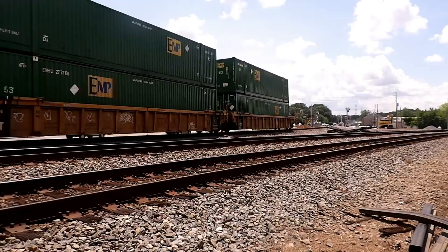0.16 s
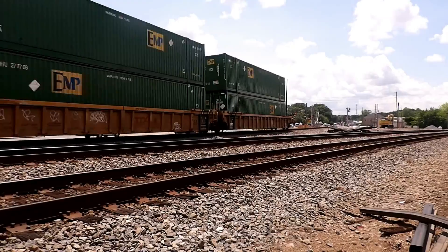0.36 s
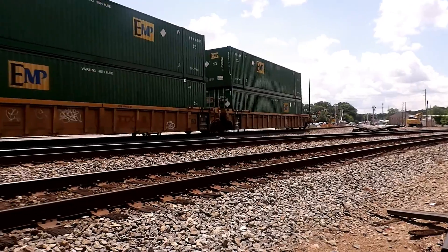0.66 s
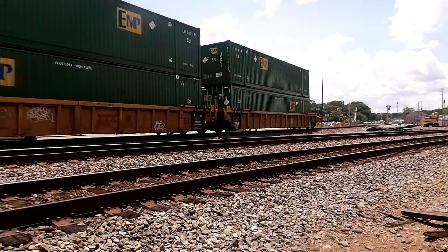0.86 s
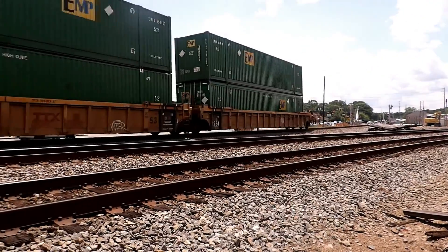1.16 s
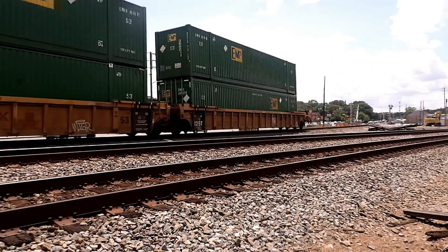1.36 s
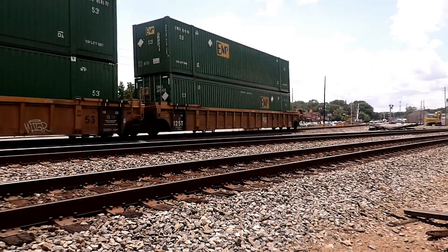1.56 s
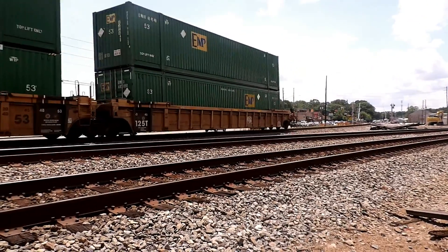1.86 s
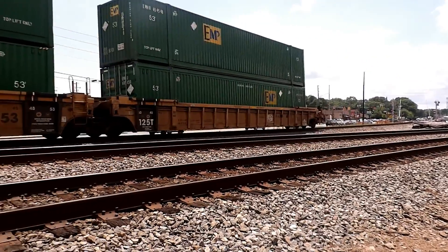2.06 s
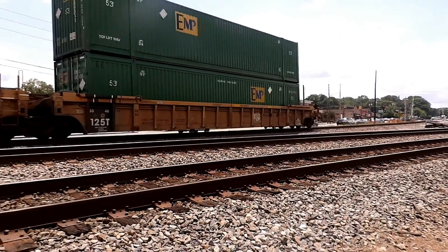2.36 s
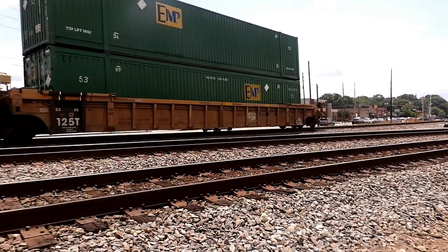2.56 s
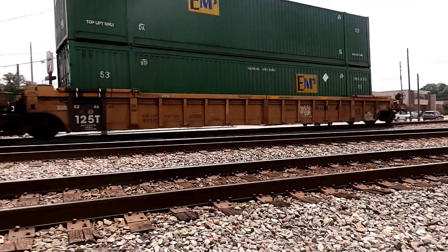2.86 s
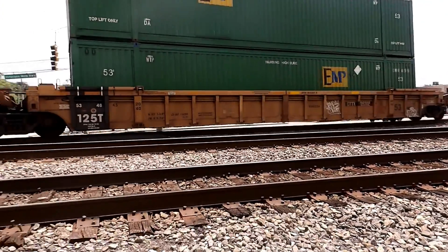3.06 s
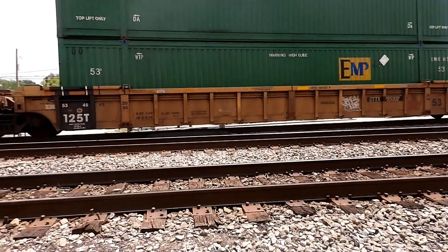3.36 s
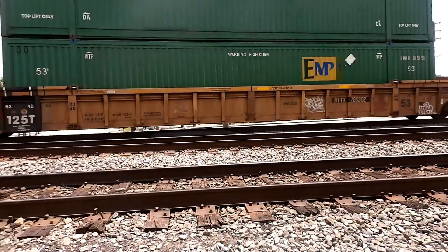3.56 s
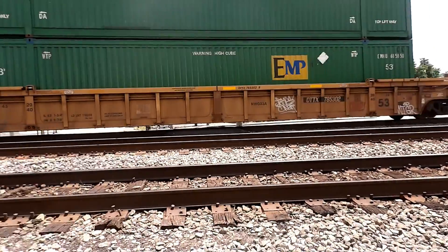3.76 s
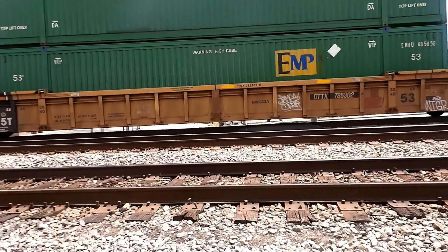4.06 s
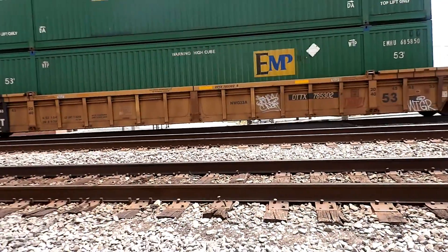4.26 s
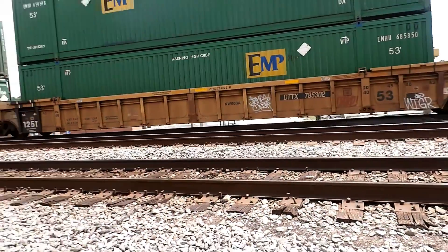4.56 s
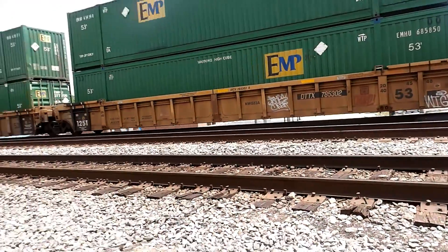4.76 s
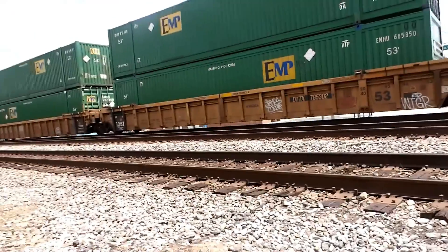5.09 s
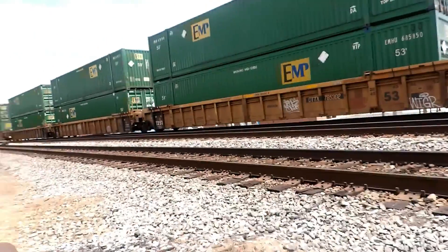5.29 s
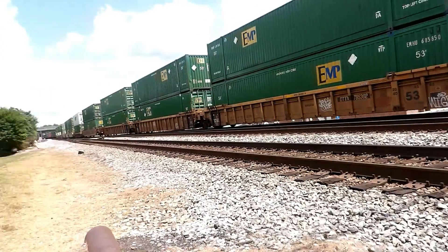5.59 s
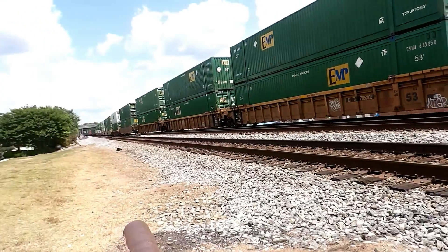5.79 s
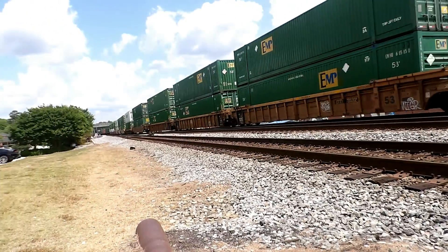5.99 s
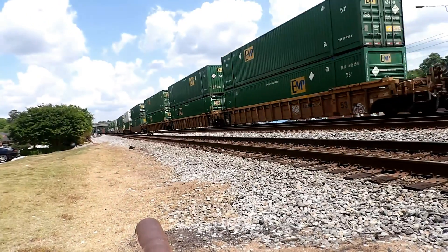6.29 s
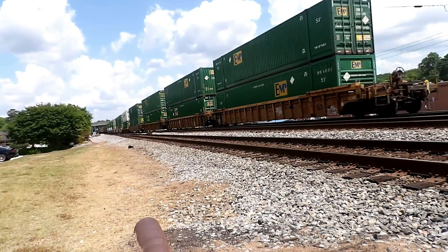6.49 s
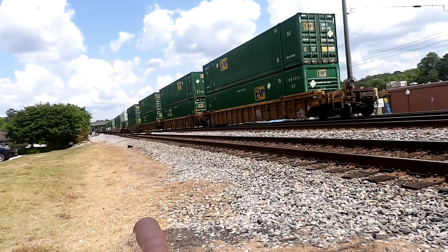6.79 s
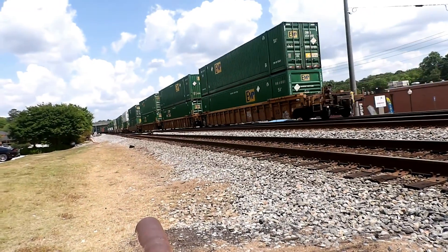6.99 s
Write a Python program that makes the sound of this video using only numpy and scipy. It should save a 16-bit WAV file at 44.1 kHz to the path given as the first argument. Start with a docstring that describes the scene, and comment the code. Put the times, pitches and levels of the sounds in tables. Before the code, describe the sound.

A freight train rolls past close by outdoors. Its steel wheels grind on the rails with a bright hiss and many overlapping high squeals, over the low rumble of the cars. After about two seconds, wind starts to flutter and pop on the handheld microphone. The ringing peaks as the wheels pass, dropping slightly in pitch. Then the squeals stop and the hiss fades, leaving short scrapes, rumble and gusts.

```python
"""A double-stack freight train rolls past at about 8 m/s. From the start, flanges grind on the rail: the
steel wheels hiss through their modes and lock into high squeals over the rumble of the cars. From 2 s,
wind flutters and pops on the single microphone of a hand-held camera. Near 3 s the wheels are abreast:
they ring most and their Doppler fall is steepest. After 5 s the squeals end and the hiss fades and
dulls; short scrapes, rumble and gusts remain."""
import sys
import numpy as np
from scipy import signal
from scipy.fft import rfft, irfft, next_fast_len
from scipy.io import wavfile
from scipy.ndimage import uniform_filter1d, map_coordinates

SR = 44100
rng = np.random.default_rng(int(sys.argv[2]) if len(sys.argv) > 2 else 0)


def generate_wav(signal):
    """Clip the signal to [-1, 1] and save it as 16-bit WAV at the path in sys.argv[1]."""
    frames = np.transpose(np.atleast_2d(signal))
    scaled = np.clip(frames, -1, 1) * 32767
    pcm = np.round(scaled).astype(np.int16)
    wavfile.write(sys.argv[1], SR, pcm)


N = 314860
TIME_S = np.arange(N) / SR

# flange grinding: time_s, level_db
GRIND_LEVEL = [(0, -18.5), (.46, -17), (.66, -20), (.95, -19.5), (1.23, -16), (1.9, -19.5), (2.27, -21.5),
               (2.65, -20.5), (3.1, -24), (3.42, -20.5), (3.55, -26.5), (4.12, -27.5), (4.3, -23),
               (4.78, -20.5), (5.25, -27.5), (5.95, -34), (7.14, -38)]
# friction brightness, dull once the wheels have passed: time_s, tilt_db_per_octave
GRIND_TILT = [(0, -1), (.48, 1), (.7, 0.1), (2, -0.23), (3, 1.3), (4.1, 0.2), (4.55, -1.1), (5.1, 1.3),
              (6.2, -4.5), (7.14, -5.5)]
# friction spectrum, shapes each band: freq_hz, density_db
FRICTION_SPECTRUM = [(250, -8), (500, -13.5), (900, -6), (1400, 0), (2000, 3.5), (4200, 1), (4900, -1.5),
                     (6300, -4.5), (8000, -6.5), (10500, -12), (12500, -12.5), (14000, -17), (15700, -21.5)]
# friction bands, low scrape to sizzle: offset_db, tilt_lever_octaves
FRICTION_BANDS = [(-16.5, -2.5), (-7, -1.54), (-1.5, -0.5), (-2.5, 0.97), (-9.5, 1.66), (-14.5, 1.5)]
# wheel resonances, silent at or below 0 dB: rest_hz, width_hz, prominence_db
WHEEL_MODES = [(1504, 58, 3.5), (2042, 263, 4.5), (2633, 123, 3.5), (3180, 106, 5.5), (3740, 49, 5.5),
               (4050, 270, 7), (4373, 81, 9), (4810, 140, 6), (5690, 62, 4.5), (5890, 160, 7.5),
               (6700, 74, 15), (6940, 81, 6), (7130, 130, 3.5), (7600, 145, 8), (8485, 156, 8),
               (9370, 130, 2), (10300, 92, 5.5), (11130, 84, -4), (12270, 80, -3), (12620, 200, -10.5),
               (13110, 150, 7), (13500, 150, 4), (14440, 150, 2)]
# brief dips in the hiss: centre_s, length_s, depth_db
HISS_DIPS = [(0.526, 0.016, -13), (0.595, 0.0084, -18.5), (0.839, 0.032, -34), (1.061, .012, -6),
             (1.268, 0.024, -5.5), (1.316, 0.031, -10), (1.467, 0.0087, -11), (1.576, .008, -7),
             (2.563, 0.031, -8), (2.718, 0.033, -45), (2.813, 0.026, -8), (3.11, .016, -47),
             (3.753, 0.011, -26), (3.923, .015, -37), (4.024, .012, -26), (4.973, .015, -11),
             (5.123, .015, -7), (5.249, .01, -13)]
# a wheel locks into one mode: start_s, length_s, rest_hz, relative_db
WHEEL_SQUEALS = [(0, .85, 4102, -26), (.27, .24, 7214, -29), (.41, .18, 6449, -28), (.44, .19, 5599, -22),
                 (.62, .24, 5605, -28), (.66, .28, 3079, -29), (.76, .15, 1529, -29), (1, .6, 3195, -27),
                 (1.13, .19, 5556, -27), (1.14, .36, 1518, -24), (1.37, .24, 7612, -26),
                 (1.37, .28, 2616, -27), (1.38, .55, 9372, -30), (1.4, 1.5, 10275, -35),
                 (2.03, .85, 4086, -22), (2.25, .55, 3187, -29), (2.3, .85, 13096, -30),
                 (2.37, .4, 8463, -28), (2.39, .18, 5825, -23), (2.43, .8, 5918, -29),
                 (2.5, .24, 4350, -19.5), (2.55, .56, 9372, -27), (2.66, .16, 3833, -24),
                 (2.68, .74, 4393, -26), (2.76, .26, 2120, -28), (2.84, .17, 7655, -22),
                 (2.98, .52, 10245, -25), (3.03, .15, 6923, -25), (3.25, .2, 4340, -25),
                 (3.32, .32, 7558, -28), (3.36, .2, 6675, -19.5), (3.48, .3, 3725, -31),
                 (3.5, .22, 5825, -28), (3.5, .24, 4360, -30), (3.5, 1.05, 10245, -33),
                 (3.53, .17, 8463, -27), (3.55, .17, 2616, -32), (3.7, .25, 4070, -21),
                 (3.84, .32, 10237, -25.5), (3.98, .9, 4081, -27), (4.24, .2, 5889, -28),
                 (4.34, .21, 6686, -25.5), (4.4, .5, 2067, -28), (4.48, .17, 4759, -30),
                 (4.73, .18, 8764, -28), (4.78, .28, 3187, -28), (4.9, .36, 4081, -24),
                 (4.95, .28, 10261, -28), (5.15, .2, 4716, -31)]
# a flange bites the rail: start_s, length_s, attack_s, rise_db, ring_db, tilt_db_per_octave
FLANGE_BITES = [(.73, 0.098, 0.018, 2, -9.5, -1), (5.344, 0.0929, 0.021, 3, 2, 0.3),
                (5.618, 0.13, 0.021, 7, -1.5, -0.2), (5.836, 0.038, 0.013, 6.5, 4.5, -0.5),
                (6.148, 0.2, 0.057, 8.5, 3.5, 2.5), (6.353, 0.12, 0.022, 9.5, 3.5, -0.5),
                (6.633, 0.11, 0.028, 6.5, -9, 0.1), (6.856, 0.19, 0.035, 4.5, -6, -.5)]
# wheel modes rung by the bites: rest_hz, relative_db
BITE_MODES = [(1023, -18.5), (1770, -20), (2010, -9), (2470, -12), (2898, -14), (3290, -12), (3998, -20),
              (4610, -11.5), (6698, -18), (8290, -19)]
# weight of the passing cars: time_s, level_db
RUMBLE_LEVEL = [(0, -31), (1.1, -30), (2.9, -32.5), (3.6, -30), (4.05, -29), (4.4, -32.5), (5.2, -26.5),
                (6.05, -31), (6.42, -22), (6.66, -36), (7.04, -21), (7.14, -33)]
# rolling cars: freq_hz, density_db
RUMBLE_SPECTRUM = [(20, -30), (40, -28), (65, -11), (100, -4), (140, -1), (200, -5.5), (300, -13),
                   (500, -17.5), (900, -24), (2000, -63), (8000, -90)]
# gusts on the microphone: start_s, length_s, relative_db
WIND_GUSTS = [(2.147, 0.1, -27), (2.373, 0.17, -30), (2.902, 0.033, -22.5), (2.991, 0.062, -30.5),
              (3.311, 0.27, -31), (3.669, 0.051, -31), (3.843, 0.091, -27), (4.015, 0.17, -27.5),
              (4.217, 0.21, -32), (4.836, 0.23, -26), (5.068, 0.14, -27.5), (5.204, 0.1, -21),
              (5.404, 0.14, -23), (5.596, .17, -23.5), (5.89, 0.045, -27.5), (6.414, .05, -22),
              (6.517, 0.082, -29), (6.636, .17, -33.5), (7, 0.079, -27)]
# eddies at the microphone port, air speed 1: freq_hz, density_db
EDDY_SPECTRUM = [(40, -32), (130, -10), (220, 0.5), (350, -1.5), (500, -11), (700, -20.5), (1000, -28),
                 (1800, -30), (6000, -100)]
# air across the port as the camera turns: time_s, speed_ratio
AIR_SPEED = [(2.2, 1.01), (3.3, 1.214), (4.2, 1.207), (5.25, .8), (5.9, .88), (7.1, 0.78)]
# strongest eddies: centre_s, relative_db, width_cycles
EDDY_POPS = [(2.188, -6.5, 0.27), (2.206, -6, 0.25), (2.928, -4, 0.91), (3.324, -7, .6),
             (3.359, -4.5, 0.18), (3.453, -6.5, 0.39), (3.482, -5, .22), (3.535, -10, .34),
             (3.593, -5.5, 0.37), (3.965, -1.5, 0.39), (4.012, -10.5, .9), (4.057, -10, 0.51),
             (4.152, -11, 0.37), (4.693, -8.5, 0.48), (4.971, -6, 1), (5.106, -6.5, 0.19), (5.22, -8, .64),
             (5.284, -9.5, .57), (5.426, -3, .96), (5.515, -6.5, 0.8), (5.71, -4.5, 1), (5.768, -3.5, 0.97),
             (5.814, -5.5, .4), (5.859, -4.5, 1), (6.077, -2.5, 0.17), (6.44, -4.5, .3), (6.459, -8, .89),
             (6.536, -3, 0.7), (7.058, 1, 0.47)]


def grinding(clock_s, ring_db=-4.0, abreast_db=5.0, abreast_s=3.12, passing_s=1.93):
    """Flange friction hisses and rings the wheels, most when abreast; later mostly scraping is left."""
    abreast = np.exp(-((TIME_S - abreast_s) / passing_s) ** 2)
    ring_gain = amp(ring_db + abreast_db * abreast) * np.interp(TIME_S, [5.37, 6.041], [1, 0.15])
    dips = dip_gain()
    steel = friction_noise() * dips + ring_gain * wheel_ring(clock_s) * dips ** 0.19
    level_db, tilt = friction_curves()
    pressure_db = level_db + 0.35 * wobble(21.92)
    edges_hz = [1, 1300, 2400, 5000, 9000, 12000, 20000]
    out = np.zeros(N)
    for lo, hi, (offset_db, octaves) in zip(edges_hz, edges_hz[1:], FRICTION_BANDS):
        band = unit(filtered(steel, lambda hz: colour(FRICTION_SPECTRUM, hz) * (hz >= lo) * (hz < hi)))
        flicker_db = 1.5 * wobble(30)
        out += band * amp(pressure_db + offset_db + octaves * tilt + flicker_db)
    return out


def friction_noise(shimmer_db=3.5):
    """The wandering contact patch excites many weak steel resonances, a moment each."""
    spectra = signal.stft(rng.standard_normal(N), nperseg=1024)[2]
    shimmer = uniform_filter1d(rng.standard_normal(spectra.shape), size=3, axis=0)
    shimmer = unit(uniform_filter1d(shimmer, size=9, axis=1))
    return unit(signal.istft(spectra * amp(shimmer_db * shimmer), nperseg=1024)[1][:N])


def friction_curves(release_s=0.032):
    """Friction level (dB) and tilt (dB/octave): the long grind plus the short bites."""
    level_db, tilt = curve(GRIND_LEVEL), curve(GRIND_TILT)
    for start_s, length_s, attack_s, rise_db, _, bite_tilt in FLANGE_BITES:
        bite = held(start_s, length_s, attack_s, release_s)
        level_db += rise_db * bite
        tilt += bite_tilt * bite
    return level_db, tilt


def wheel_ring(clock_s, wheels=9, swell_db=10.8, swell_hz=6, flicker_hz=45, scatter=0.38):
    """Unequally worn wheels: each mode is a cluster of tones that swell and fade independently."""
    coarse_s = np.linspace(0, TIME_S[-1], N // 20)
    out = np.zeros(N)
    for rest_hz, width_hz, prominence_db in WHEEL_MODES:
        spread = np.linspace(-np.pi / 2, np.pi / 2, wheels) + rng.uniform(-0.2, 0.2, wheels)
        cluster = 0
        for detune_hz in scatter * width_hz * spread:
            grip = amp(swell_db * np.tanh(wobble(swell_hz, coarse_s) / 2))
            paths = reflections(1.0, flicker_hz, coarse_s)
            cluster += grip * paths * np.exp(2j * np.pi * (detune_hz * coarse_s + rng.random()))
        excess_power = max(amp(prominence_db) ** 2 - 1, 0)  # over white noise of rms 1
        strength = 2 * np.sqrt(excess_power * width_hz * 2 / SR)
        carrier = np.exp(2j * np.pi * rest_hz * clock_s)
        out += strength * np.real(np.interp(TIME_S, coarse_s, unit(cluster)) * carrier)
    return out


def squeals(clock_s, gain_db=-1, attack_s=0.0597, release_s=0.065):
    """Stick-slip feeds one wheel mode per squeal; it swells, holds and fades."""
    out = np.zeros(N)
    for start_s, length_s, rest_hz, relative_db in WHEEL_SQUEALS:
        envelope = amp(relative_db + gain_db) * held(start_s, length_s, attack_s, release_s)
        out += mode_tone(rest_hz, envelope, clock_s, depth=0.7, flicker_hz=40.17, waver_hz=5.7)
    return out


def bite_ring(clock_s, release_s=0.039):
    """Each flange bite rings the same set of wheel modes."""
    contact = sum(amp(ring_db) * held(start_s, length_s, attack_s, release_s)
                  for start_s, length_s, attack_s, _, ring_db, _ in FLANGE_BITES)
    friction_db, _ = friction_curves()
    envelope = contact * amp(friction_db)
    return sum(mode_tone(hz, amp(db) * envelope, clock_s, depth=1.0, flicker_hz=34.84, waver_hz=8.47)
               for hz, db in BITE_MODES)


def mode_tone(rest_hz, envelope, clock_s, depth, flicker_hz, waver_hz):
    """One wheel mode, wavering in pitch; shifting reflections make it flicker."""
    active = envelope > envelope.max() / 300
    time_s = TIME_S[active]
    paths = unit(reflections(depth, flicker_hz, time_s))
    waver_cycles = np.cumsum(waver_hz * wobble(12.22, time_s)) / SR
    cycles = rest_hz * clock_s[active] + waver_cycles + rng.random()
    out = np.zeros(N)
    out[active] = envelope[active] * np.sqrt(2) * np.real(paths * np.exp(2j * np.pi * cycles))
    return out


def reflections(depth, rate_hz, time_s):
    """Complex gain of direct sound plus moving reflections."""
    return 1 + depth * (wobble(rate_hz, time_s) + 1j * wobble(rate_hz, time_s))


def doppler_clock(mach=0.024, nearest_s=3.2, passing_s=1.7):
    """Emission time at the wheels; the changing path gives the Doppler fall."""
    delay_s = mach * np.hypot(TIME_S - nearest_s, passing_s)
    return TIME_S - delay_s + delay_s[0]


def dip_gain():
    """The level dips briefly, with a flat bottom."""
    return amp(sum(depth_db * np.exp(-(2 * (TIME_S - centre_s) / length_s) ** 4)
                   for centre_s, length_s, depth_db in HISS_DIPS))


def rumble(lumpy_db=1.67, deep_hz=240):
    """Loaded cars shake the track; the deepest part carries on through the dips."""
    shake = noise(RUMBLE_SPECTRUM)
    deep = filtered(shake, lambda hz: 1 / (1 + (hz / deep_hz) ** 8))
    level_db = curve(RUMBLE_LEVEL) + lumpy_db * wobble(12)
    return amp(level_db) * (deep + (shake - deep) * dip_gain())


def wind(eddy_db=1.5, lumpy_db=5.5, crackle_db=-3, kicks_per_s=55, crackle_hz=560):
    """Gusts break into eddies at the microphone port: low, lumpy flutter dotted with small pops."""
    breeze = amp(-41) * held(start_s=2.97, length_s=3, attack_s=0.23, release_s=0.23)
    gusts = sum(amp(db) * held(start_s, length_s, attack_s=0.017, release_s=0.0077)
                for start_s, length_s, db in WIND_GUSTS)
    lumps = amp(lumpy_db * np.clip(wobble(90), -2, 1.5))
    eddies = unit(lumps * noise(EDDY_SPECTRUM))
    kicks = (rng.random(N) < kicks_per_s / SR) * rng.uniform(0.53, 1, N)
    crackle = -unit(filtered(kicks, lambda hz: hz * np.exp(-(hz / crackle_hz) ** 2)))
    air = amp(eddy_db) * eddies + amp(crackle_db) * crackle
    position = np.cumsum(curve(AIR_SPEED)) % N  # air speed scales all rates and pitches above
    return (breeze + gusts) * np.interp(position, np.arange(N), air)


def wind_pops(gain_db=2.0, base_hz=380, tip_share=0.63, tip_s=0.00024, leak_hz=70):
    """A strong eddy sucks at the diaphragm for about a cycle, sharp-tipped; faster air pops higher."""
    out = np.zeros(N)
    for centre_s, relative_db, width_cycles in EDDY_POPS:
        pitch_hz = base_hz * curve(AIR_SPEED, centre_s)
        active = np.abs(TIME_S - centre_s) < 0.02
        offset_s = TIME_S[active] - centre_s
        cycles = offset_s * pitch_hz
        swing = np.cos(2 * np.pi * cycles + rng.standard_normal()) / np.cosh(cycles / width_cycles) ** 2
        tip = 1 / np.cosh(offset_s / tip_s)
        out[active] -= amp(relative_db + gain_db) * ((1 - tip_share) * swing + tip_share * tip)
    return filtered(out, lambda hz: hz ** 2 / (hz ** 2 + leak_hz ** 2))  # the port leaks slow pressure


def amp(db):
    """dB to gain."""
    return 10 ** (np.asarray(db) / 20)


def unit(x):
    """x at rms 1."""
    return x / np.sqrt(np.mean(np.abs(x) ** 2) + 1e-20)


def colour(spectrum, hz):
    """Gain of (freq_hz, density_db) points joined on a log axis."""
    freq_hz, density_db = np.transpose(spectrum)
    return amp(np.interp(np.log(hz + 1), np.log(freq_hz), density_db))


def curve(points, time_s=TIME_S):
    """(time_s, value) points joined by lines."""
    return np.interp(time_s, *np.transpose(points))


def held(start_s, length_s, attack_s, release_s):
    """Envelope: swell around start_s, hold, fade."""
    rise = 1 + np.tanh((TIME_S - start_s) / attack_s)
    fall = 1 - np.tanh((TIME_S - start_s - length_s) / release_s)
    return rise * fall / 4


def wobble(rate_hz, time_s=TIME_S):
    """Smooth random curve, rate_hz knots a second."""
    position = (time_s - time_s[0]) * rate_hz
    knots = rng.standard_normal(int(position[-1]) + 4)
    grid = np.arange(0, position[-1] + 1, 1 / 8)
    return np.interp(position, grid, map_coordinates(knots, [grid + 1]))


def filtered(x, response):
    """Zero-phase filter with gain response(hz)."""
    size = next_fast_len(N + 8192)
    return irfft(rfft(x, size) * response(np.fft.rfftfreq(size, 1 / SR)), size)[:N]


def noise(spectrum):
    """Coloured noise, rms 1."""
    return unit(filtered(rng.standard_normal(N), lambda hz: colour(spectrum, hz)))


def scene():
    """Wheels, cars and wind at one microphone, alike in both channels."""
    clock_s = doppler_clock()
    wheels = grinding(clock_s) + squeals(clock_s) + bite_ring(clock_s)
    mono = wheels + rumble() + wind() + wind_pops()
    return np.array([mono, mono])


def record(dry, notch_hz=5000, half_width_hz=100, notch_db=-16, top_hz=15800):
    """Camera: rounded peaks, a narrow treble notch, a band limit."""
    rounded = dry / (1 + np.abs(dry) ** 6) ** (1 / 6)
    notch = lambda hz: amp(notch_db / (1 + ((hz - notch_hz) / half_width_hz) ** 2))
    return np.array([filtered(x, lambda hz: notch(hz) * (hz < top_hz)) for x in rounded])


dry = scene()
out = record(dry)
generate_wav(out)
```